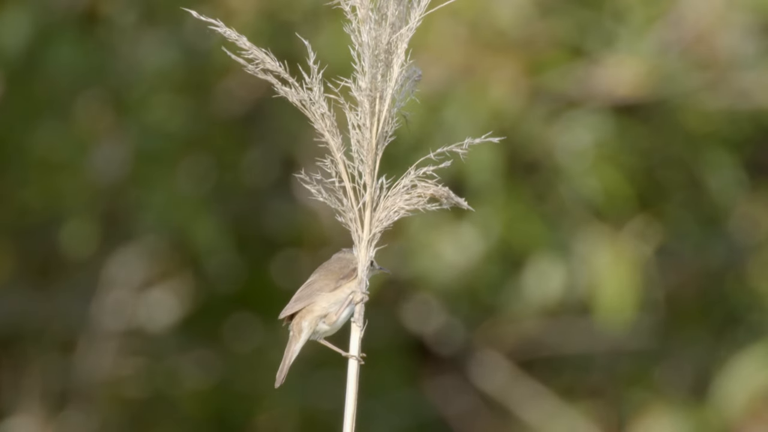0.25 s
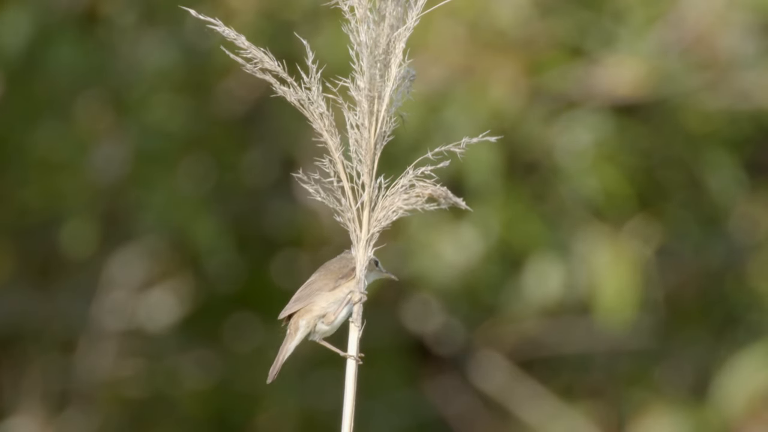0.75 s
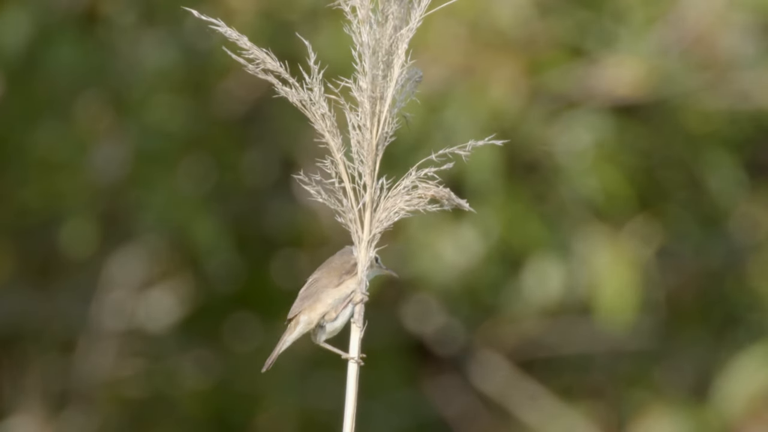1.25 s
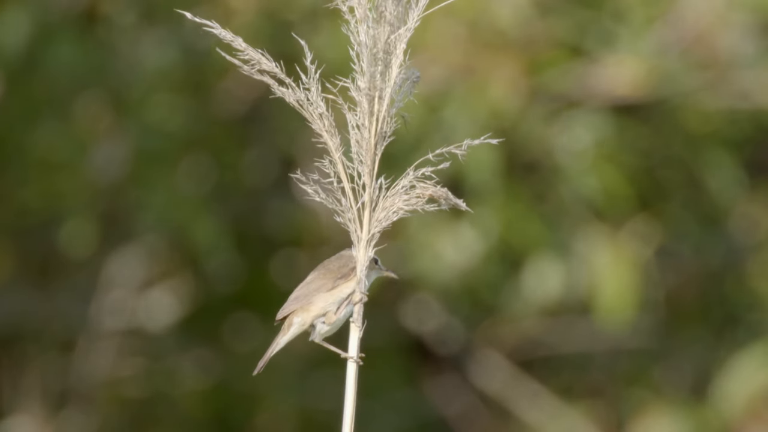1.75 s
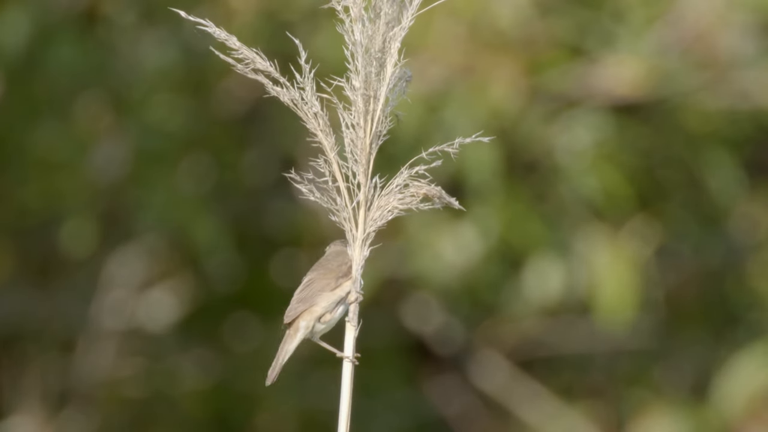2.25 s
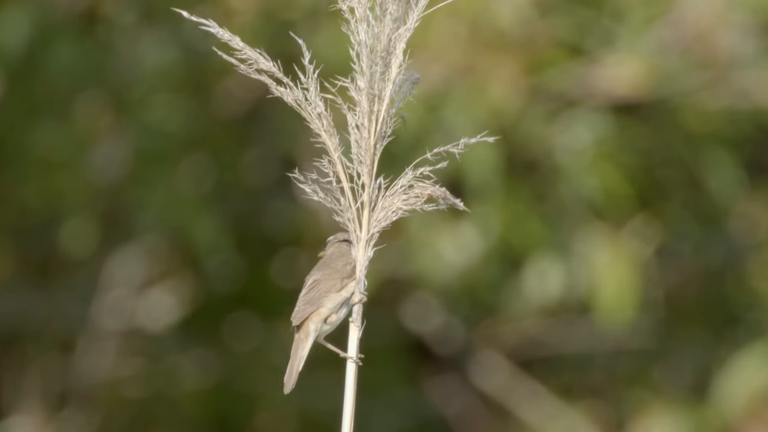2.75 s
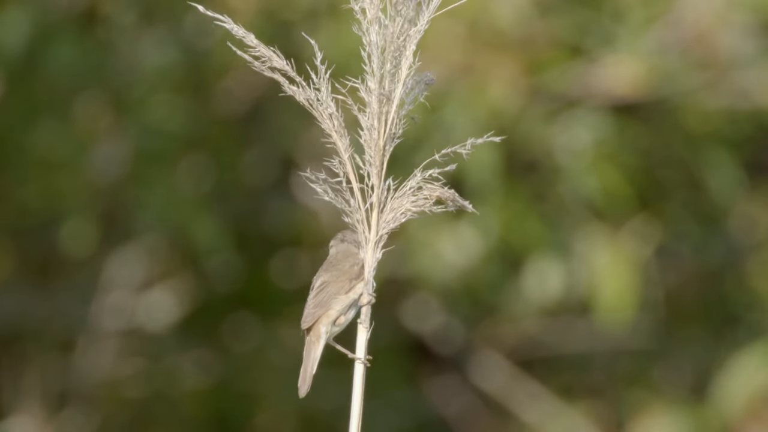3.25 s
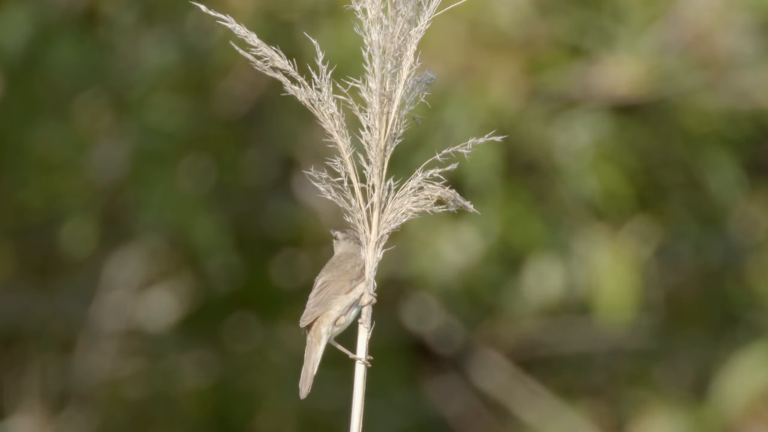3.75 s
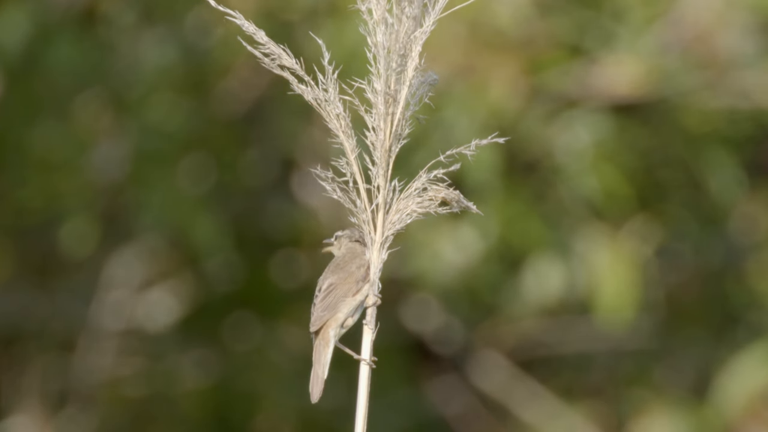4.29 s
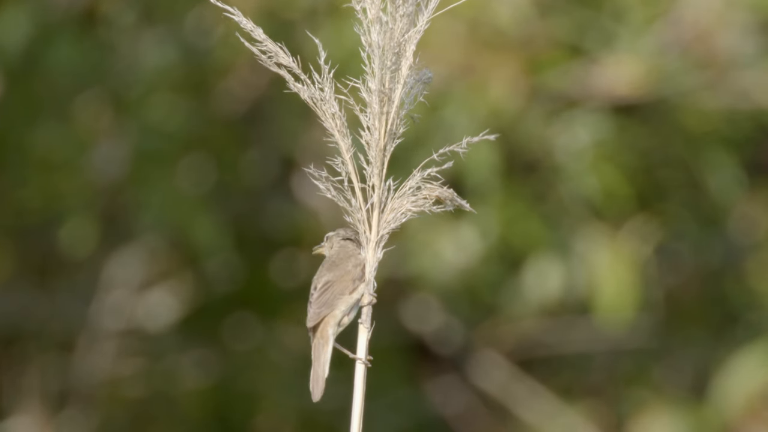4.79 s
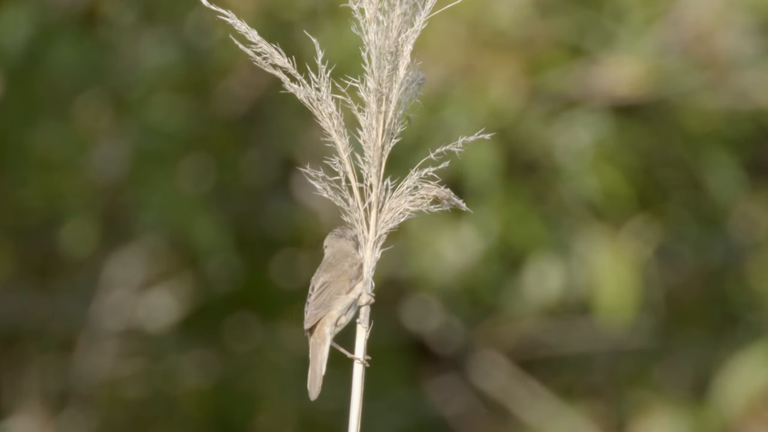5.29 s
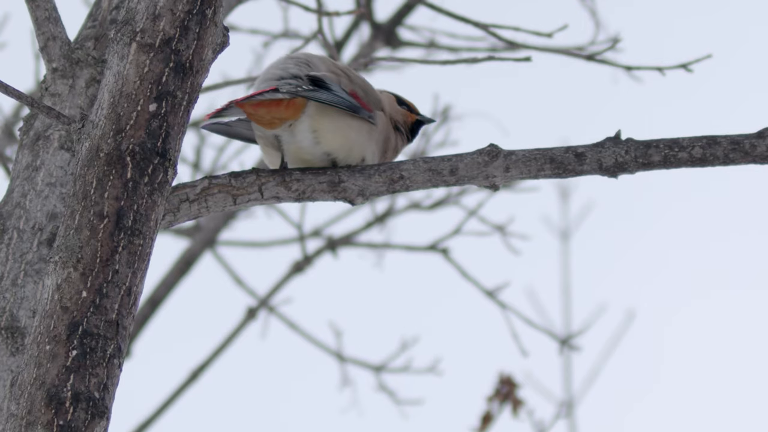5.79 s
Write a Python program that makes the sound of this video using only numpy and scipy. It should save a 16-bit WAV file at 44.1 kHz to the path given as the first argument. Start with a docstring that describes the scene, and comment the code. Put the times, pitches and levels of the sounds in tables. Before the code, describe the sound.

Outdoors in reeds, soft hiss and faint, quick twittering from distant birds come first. A close songbird then gives crisp paired chips that grow louder, a low pure whistle swells nearby, and a busy burst of flicks and short notes follows. Strong, evenly spaced falling slides take over with short reed echoes and a longer tree tail. A hard cut leaves quiet, dull noise with a thin tone.

```python
"""A warbler in a reed bed sings sharp chips and falling slides, each note a sine steered in pitch and level.
Rising calls and flicks come from among the reeds, a second bird whistles low, and farther birds chatter,
trill and buzz as shorter, weaker sines. Soft outdoor hiss and faint bands of noise lie underneath.
Decaying bursts of noise serve as echoes from reeds and trees. Near the end the scene cuts to a duller,
quieter place with a thin tone near 1.4 kHz."""
import sys
import numpy as np
from scipy import signal
from scipy.fft import rfft, irfft, next_fast_len
from scipy.io import wavfile
from scipy.ndimage import uniform_filter1d, minimum_filter1d

SR = 44100
rng = np.random.default_rng(int(sys.argv[2]) if len(sys.argv) > 2 else 0)


def master(y):
    """Save y as 16-bit WAV."""
    cut = np.clip(np.atleast_2d(y).T, -1, 1)
    pcm = np.round(cut * 32767)  # scale
    wavfile.write(sys.argv[1], SR, pcm.astype(np.int16))


N = 265967   # samples
TIME_S = np.arange(N) / SR
CUT_S = 5.703   # middle of the cut to the second place


def from_db(db):
    """Decibels to gain."""
    return 10 ** (np.asarray(db) / 20)


def whistle(notes):
    """Each note is a sine that follows its rows of time, pitch and rms level, corners rounded."""
    out = np.zeros(N)
    for rows, start_cycle in zip(notes, rng.random(len(notes))):
        t, hz, db = np.transpose(rows)
        at = np.arange(max(int(t[0] * SR), 0), min(int(t[-1] * SR), N))
        hz = uniform_filter1d(np.interp(at / SR, t, hz), size=60, mode="nearest")
        db = uniform_filter1d(np.interp(at / SR, t, db), size=60, mode="nearest")
        fade = np.clip(np.minimum(at - at[0], at[-1] - at) / 40, 0, 1)   # 40 samples, against clicks
        cycles = start_cycle + np.cumsum(hz) / SR
        out[at] += np.sqrt(2) * fade * from_db(db) * np.sin(2 * np.pi * cycles)
    return out


def with_octave(notes, octave_db):
    """Notes with a faint octave from the syrinx."""
    octave = [[(t, 2 * hz, db + octave_db) for t, hz, db in rows] for rows in notes]
    return whistle(notes) + whistle(octave)


def from_shape(shape, events):
    """Places a note shape at each event, shifted in pitch and level and stretched in time."""
    return [[(t + dt * stretch, hz * ratio, db + level_db) for dt, hz, db in shape]
            for t, level_db, ratio, stretch in events]


def swinging_note(rows, swing):
    """Pitch swings about its centre and the level dips at the top of each swing."""
    per_s, swing_hz, lowest_s, loss_db = swing
    at, centre_hz, db = np.transpose(rows)
    t = np.arange(at[0], at[-1], 4 / SR)
    up = -np.cos(2 * np.pi * per_s * (t - lowest_s))   # -1 at the bottom, 1 at the top
    hz = np.interp(t, at, centre_hz) + swing_hz * up
    return np.c_[t, hz, np.interp(t, at, db) - loss_db * (1 + up) / 2]


def coloured_noise(spectrum, patchy_db, sway_db=0):
    """White noise shaped by a spectrum, its half-octave bands flickering and swaying under a steady treble; rms 1."""
    size = next_fast_len(N)
    hz = np.maximum(np.arange(size // 2 + 1) * SR / size, 1)
    point_hz, point_db = np.transpose(spectrum)
    colour_db = np.interp(np.log(hz), np.log(point_hz), point_db)
    shaped = rfft(rng.standard_normal(size)) * from_db(colour_db)
    half_octave = np.clip(2 * np.log2(hz / 30), 0, 18)
    out = 0
    for band in range(19):
        share = np.clip(1 - abs(half_octave - band), 0, 1)   # neighbouring bands crossfade
        flicker = np.interp(np.arange(N), np.linspace(0, N, 40), rng.standard_normal(40))
        unsteady = np.clip((17 - band) / 3, 0, 1)   # fades out from about 4 to 11 kHz
        out = out + irfft(shaped * share, size)[:N] * from_db(unsteady * (patchy_db * flicker + sway_db))
    return out / np.std(out)


def noise_band(gain, hz, width_hz):
    """A band of noise, levelled to rms 1 and put under a gain curve."""
    edges = [hz - width_hz / 2, hz + width_hz / 2]
    band = signal.sosfilt(signal.butter(2, edges, "band", fs=SR, output="sos"), rng.standard_normal(N))
    return gain * band / np.std(band)


def swells(events):
    """Gain of smooth rises and falls, one for each row of middle, length and level."""
    gain = 0
    for middle, length, db in events:
        place = np.clip((TIME_S - middle) / length, -.5, .5)
        gain = gain + from_db(db) * np.cos(np.pi * place) ** 2
    return gain


def scatter(x, clusters):
    """Dense random echoes: one decaying noise burst for each cluster of reflectors."""
    t, echoes = np.arange(SR) / SR, 0
    for start, t60, energy_db in clusters:
        onset = np.clip((t - start) / 0.00092, 0, 1)
        tail = rng.standard_normal(SR) * onset * from_db(-60 * t / t60)
        echoes = echoes + from_db(energy_db) * tail / np.sqrt(np.sum(tail ** 2))
    return signal.fftconvolve(x, echoes)[:N]


# spectrum of the second place: f/Hz, relative level/dB (per Hz)
QUIET_SPECTRUM = [(15, -70), (25, -44), (285, -32), (607, -22), (734, -13), (1230, -14), (1400, -9),
                  (1520, -6.5), (2480, -10.5), (4870, -26), (5430, -33), (14000, -41.5), (16000, -46)]
# its thin tone: t/s, f/Hz, level/dB
THIN_TONE_ROWS = [(5.71, 1440, -62), (5.724, 1408, -46.5), (5.862, 1387, -47), (5.892, 1393, -57.5),
                  (5.97, 1398, -43.5), (6.03, 1390, -40.5)]


def quiet_place():
    """Dull, patchy noise with one thin sine on top."""
    return from_db(-46) * coloured_noise(QUIET_SPECTRUM, patchy_db=1.5) + whistle([THIN_TONE_ROWS])


# spectrum of the outdoor hiss: f/Hz, relative level/dB (per Hz)
HISS_SPECTRUM = [(15, -66), (25, -40.5), (87, -35.5), (180, -28), (229, -22.5), (394, -14.5), (463, -9.5),
                 (560, -11.5), (936, -2.5), (1790, -2), (2910, -0.5), (3430, -2.5), (7110, -11.5),
                 (14800, -16), (16000, -14.5)]
# slow sway below the treble, heard as departures from its mean: t/s, level/dB
HISS_SWAY_ROWS = [(0.0, -52), (0.32, -53), (0.68, -52.5), (1.05, -53.5), (1.44, -52.5), (4.06, -54.5),
                  (4.46, -53), (5.56, -54), (5.7, -53)]


def outdoor_hiss():
    """Soft broadband noise whose level sways below a steady treble."""
    t, db = np.transpose(HISS_SWAY_ROWS)
    sway_db = np.interp(TIME_S, t, db - np.mean(db))
    return from_db(-43) * coloured_noise(HISS_SPECTRUM, patchy_db=.5, sway_db=sway_db)


# wind on the microphone: middle t/s, length/s, level/dB
WIND_PUFFS = [(.07, 0.18, -80), (.21, .08, -78), (.31, .09, -84)]


def wind_puffs():
    """Brief swells of noise around 48 Hz."""
    return noise_band(swells(WIND_PUFFS), hz=48, width_hz=52)


# low rumble: middle t/s, length/s, level/dB
RUMBLE_SWELLS = [(.0, 0.26, -59), (.65, 0.37, -61.5)]


def rumble():
    """Swells of noise around 386 Hz."""
    return noise_band(swells(RUMBLE_SWELLS), hz=386, width_hz=160)


# faint low hums that come and go: middle t/s, length/s, f/Hz, level/dB
HUM_SWELLS = [(1.5, 1.9, 246, -76), (2.95, 0.4, 245, -71.5), (5.2, 2.1, 236, -79), (1.35, 1.9, 485, -65.5),
              (2.035, 1.34, 473, -62), (4.41, 0.91, 505.4, -63), (5.125, 0.66, 360, -63),
              (5.6, .3, 343, -67)]


def hums():
    """Noise bands so narrow that each sounds like a wavering pitch."""
    return sum(noise_band(swells([(middle, length, db)]), hz, width_hz=14)
               for middle, length, hz, db in HUM_SWELLS)


# thin band of noise, perhaps an insect: middle t/s, length/s, level/dB
THIN_BAND_SWELLS = [(.12, 0.22, -47.5), (.3, 0.45, -51), (.47, 0.28, -52)]
# its band: centre f/Hz, width/Hz
THIN_BAND_PLACE = (2790, 59)


def thin_band():
    """Overlapping swells of narrow noise."""
    return noise_band(swells(THIN_BAND_SWELLS), *THIN_BAND_PLACE)


# level of the faint far chorus: t/s, level/dB
CHORUS_LEVEL = [(0.0, -57), (1.3, -64), (2.0, -54.5), (3.3, -55), (5.7, -48.5)]
# its band: centre f/Hz, width/Hz
CHORUS_BAND = (2883, 180)


def far_chorus():
    """A chorus blurred into one band of noise whose level drifts."""
    t, db = np.transpose(CHORUS_LEVEL)
    return noise_band(from_db(np.interp(TIME_S, t, db)), *CHORUS_BAND)


# pitch range of the farthest birds: lowest and highest middle f/Hz
FLUTTER_RANGE = (2500, 5150)
# how forward they are: t/s, added level/dB
FLUTTER_FORWARD = [(0, 3), (1.4, -1), (1.7, -5), (2.4, 7), (3., .1), (3.7, 6), (4., 0.5), (5.7, -1.5)]


def flutter_strokes():
    """Half-buried strokes of the farthest birds, scattered at random in time, pitch, glide, length and level."""
    when, pitch, sweep, length, level = rng.random((520, 5)).T
    t = when * CUT_S
    low_hz, high_hz = FLUTTER_RANGE
    middle_hz = low_hz * (high_hz / low_hz) ** pitch
    glide_hz = 1100 * (sweep - .35)   # most strokes rise
    db = -53 + 6 * level + np.interp(t, *np.transpose(FLUTTER_FORWARD))
    length_ms = 3.5 + 5 * length
    return list(np.c_[t, length_ms, middle_hz - glide_hz, middle_hz, middle_hz + .3 * glide_hz, db])


# a neighbour's phrase, two steep strokes and three hooks stepping down:
# t after the start/ms, length/ms, start f/Hz, middle f/Hz, end f/Hz, relative level/dB
PHRASE_SHAPE = [(0, 7, 3100, 4300, 5250, -8), (38, 6.5, 3250, 4450, 5100, -6),
                (53, 12, 3750, 4600, 4250, -1), (70, 12, 3600, 4350, 4680, -1),
                (87, 14, 3500, 4200, 4300, 0)]
# where it is sung: t/s, level/dB, pitch ratio
PHRASE_EVENTS = [(3.917, -33.5, 1.03), (4.091, -31.5, 1.01), (4.27, -28.5, .97), (4.45, -32, .98)]
# a farther bird's triplet of hooks:
# t after the start/ms, length/ms, start f/Hz, middle f/Hz, end f/Hz, relative level/dB
TRIPLET_SHAPE = [(0, 9, 4100, 4700, 4600, -3), (16, 7, 3450, 3980, 4000, -1.5),
                 (35, 7.5, 3450, 3900, 3880, 0)]
# where it is sung: t/s, level/dB, pitch ratio
TRIPLET_EVENTS = [(0.77, -39, 1.01), (0.864, -38, 1), (0.961, -39, 1.01), (1.062, -38.5, 1.),
                  (1.163, -40, 0.96)]
# runs of one repeated note: t/s, notes, spacing/ms, length/ms,
# start f/Hz, middle f/Hz, end f/Hz, first level/dB, growth per note/dB
NOTE_RUNS = [(0.288, 2, 49, 24, 5200, 4900, 4860, -42.5, 2),
             (1.375, 4, 97, 24, 5900, 5850, 5200, -47, -1.5), (2.33, 2, 49, 16, 3540, 3450, 3650, -52, 3),
             (2.427, 2, 33, 12.4, 3200, 3320, 3800, -42, 1), (2.34, 4, 36, 6.5, 2750, 2650, 2450, -39.5, 0),
             (2.762, 5, 34.6, 13, 3156, 3410, 3820, -45, 1.1),
             (2.77, 4, 38, 5.1, 2410, 2555, 2750, -45, -1),
             (3.905, 3, 90, 42, 2800, 2495, 2360, -41.5, 0.4),
             (5.218, 2, 36, 19, 3390, 3260, 2470, -27, 1.5), (5.333, 2, 36, 20, 3355, 3255, 2400, -29, 0),
             (5.54, 4, 37, 6, 2810, 2925, 3010, -45.5, 4.5)]


def patterned_notes():
    """Unrolls phrases, triplets and runs into single notes."""
    notes = []
    for motif, events in ((PHRASE_SHAPE, PHRASE_EVENTS), (TRIPLET_SHAPE, TRIPLET_EVENTS)):
        for t, level_db, ratio in events:
            for ms, length, start_hz, middle_hz, end_hz, db in motif:
                notes.append((t + ms / 1000, length, start_hz * ratio, middle_hz * ratio,
                              end_hz * ratio, db + level_db))
    for t, count, gap_ms, *shape, db, growth_db in NOTE_RUNS:
        for k in range(round(count)):
            notes.append((t + k * gap_ms / 1000, *shape, db + k * growth_db))
    return notes


# clearest lone notes of far birds: t/s, length/ms, start f/Hz, middle f/Hz, end f/Hz, level/dB
LONE_STROKES = [(0.0, 8, 4760, 4830, 4930, -38), (0.212, 9, 4500, 4710, 4800, -44),
                (0.243, 15, 4560, 4830, 4560, -39), (0.245, 20, 2500, 2330, 2220, -45),
                (0.564, 10.4, 5890, 5140, 4930, -43), (0.647, 6, 3850, 4040, 3800, -42),
                (0.682, 11, 4330, 4860, 4840, -42), (0.738, 30, 4540, 4510, 4930, -46),
                (0.828, 8.6, 5370, 4570, 4580, -40), (0.835, 10, 3920, 3560, 3030, -43),
                (0.94, 24, 4550, 4800, 4770, -46), (1.113, 9.8, 4570, 4850, 4500, -42),
                (1.135, 4.2, 5470, 4770, 4870, -36), (1.262, 5, 4790, 4670, 3910, -35),
                (1.277, 8, 2040, 2280, 2120, -44), (1.294, 5, 3860, 3900, 3820, -34.5),
                (1.316, 17, 2050, 2210, 2420, -41), (1.39, 10, 5300, 4720, 4300, -45),
                (1.407, 6, 5040, 4670, 4350, -41), (1.569, 12.6, 2860, 3120, 3430, -39.5),
                (1.803, 14, 2450, 2520, 2900, -46), (1.858, 13, 2700, 2980, 2900, -42),
                (1.878, 12, 2900, 2770, 2590, -47), (2.004, 4.4, 2740, 2850, 2650, -41),
                (2.24, 19, 4770, 4850, 4840, -49), (2.298, 8.4, 2380, 2640, 2560, -42),
                (2.39, 12, 4900, 4860, 4920, -43), (2.471, 9.2, 2190, 2650, 2810, -42),
                (2.486, 10, 3980, 4170, 3610, -39), (2.648, 5, 3610, 4000, 3790, -33),
                (2.85, 16, 5600, 5800, 5850, -53), (2.94, 25, 4720, 4870, 4950, -45),
                (3.098, 15, 4700, 4940, 4620, -42), (3.165, 7.5, 3300, 4340, 5100, -41),
                (3.187, 8, 5240, 4310, 3300, -35.5), (3.195, 25, 5100, 5330, 5450, -45.5),
                (3.331, 3, 10600, 9700, 8300, -35.5), (3.486, 5, 5410, 5107, 5070, -43),
                (3.639, 25, 4600, 4700, 4900, -47.5), (3.682, 4, 2530, 2940, 2830, -37),
                (3.711, 7.1, 1813, 2740, 2900, -38), (4.558, 76, 7360, 7120, 6650, -50.5),
                (5.041, 7.2, 5400, 5940, 7200, -49)]
# the warbler's soft arching note: t after the start/s, f/Hz, relative level/dB
ARCH_SHAPE = [(0, 2900, -20), (.002, 3690, -7), (.005, 4230, -1), (.009, 4150, -1), (.014, 3900, 1),
              (.017, 3500, -18), (.02, 3100, -16)]
# where it is sung: t/s, level/dB, pitch ratio, time stretch
ARCH_EVENTS = [(1.701, -41.5, 0.98, 1), (1.861, -39, 0.95, 0.94), (1.918, -37, 0.99, 1.24),
               (1.982, -32.5, 1, 1.04), (2.062, -29, 1.01, 1.12), (2.164, -28, 0.95, 0.93)]


def chatter():
    """Short far notes, whose pitch bends along a parabola through three points while the level rises and falls,
    and the warbler's soft arching notes."""
    u, notes = np.linspace(0, 1, 9), []   # u runs from start to end of a note
    for t, ms, start_hz, middle_hz, end_hz, db in LONE_STROKES + patterned_notes() + flutter_strokes():
        bend = np.polyfit([0, .5, 1], [start_hz, middle_hz, end_hz], 2)
        notes.append(np.c_[t + u * ms / 1000, np.polyval(bend, u), db - 10 * (2 * u - 1) ** 4])
    return whistle(notes + from_shape(ARCH_SHAPE, ARCH_EVENTS))


# short buzzes of a far bird: t/s, length/s, level/dB
BUZZ_EVENTS = [(4.735, 0.017, -45), (4.79, 0.012, -44), (4.85, 0.018, -44), (4.908, 0.01, -44),
               (4.965, 0.016, -41), (5.02, 0.016, -43), (5.081, 0.016, -38.5), (5.138, 0.015, -43.5),
               (5.558, 0.027, -39), (5.64, 0.024, -39)]
# their swing: swings per s, swing f/Hz, level lost at the top/dB
BUZZ_MOTION = (115, 950, 3)


def buzzes():
    """Each buzz is a few wide swings of pitch, starting at the bottom."""
    centre_hz = 4390
    per_s, swing_hz, loss_db = BUZZ_MOTION
    notes = []
    for t, length, db in BUZZ_EVENTS:
        rows = [(t, centre_hz, db), (t + length, centre_hz, db)]
        notes.append(swinging_note(rows, (per_s, swing_hz, t, loss_db)))
    return whistle(notes)


# a high trill: t/s, centre f/Hz, level/dB
TRILL_ROWS = [(5.052, 6900, -50.5), (5.06, 6370, -35.5), (5.235, 6370, -36.5), (5.25, 6350, -59)]
# its swing: swings per s, swing f/Hz, lowest at t/s, level lost at the top/dB
TRILL_MOTION = (47.8, 280, 5.062, 6)
# its echoes: start t/s, t60/s, energy level/dB
TRILL_ECHOES = [(.003, .11, -8.5), (.012, .7, -7)]


def triller():
    """A high whistle whose pitch swings fast, heard with its own scattered echoes."""
    trill = whistle([swinging_note(TRILL_ROWS, TRILL_MOTION)])
    return trill + scatter(trill, TRILL_ECHOES)


# the low whistler's long swell: t/s, f/Hz, level/dB
WHISTLER_SWELL = [(2.86, 1343, -63), (2.888, 1365, -54), (3.13, 1304, -48.5), (3.524, 1314, -42.5),
                  (3.586, 1319, -37), (3.9, 1321, -24.5), (3.954, 1305, -26), (3.97, 1283, -24),
                  (3.99, 1298, -53)]
# its three short notes, each with rows of: t/s, f/Hz, level/dB
WHISTLER_NOTES = [
    [(4.024, 1670, -41), (4.029, 1643, -23), (4.035, 1538, -17.5), (4.044, 1450, -16), (4.059, 1460, -19),
     (4.086, 1436, -19), (4.093, 1410, -23), (4.098, 1440, -42)],
    [(4.141, 2180, -36.5), (4.146, 2444, -25), (4.152, 2285, -13), (4.16, 2030, -18.5), (4.168, 2172, -13),
     (4.188, 2210, -13), (4.194, 2173, -12), (4.2, 2020, -36)],
    [(4.261, 3540, -51), (4.265, 3544, -26.5), (4.273, 3576, -23.5), (4.281, 3177, -19),
     (4.2835, 2920, -40), (4.287, 2856, -26), (4.291, 2478, -13.5), (4.296, 2216, -15),
     (4.305, 1836, -15.5), (4.323, 1358, -20), (4.332, 1175, -34), (4.348, 1060, -45)],
]


def low_whistler():
    """A second bird nearby: one long pure tone that swells, then three short notes."""
    return whistle([WHISTLER_SWELL] + WHISTLER_NOTES)


# two rising calls, each with rows of: t/s, f/Hz, level/dB
RISING_CALLS = [
    [(5.473, 3140, -45), (5.476, 3840, -19.5), (5.478, 5340, -11), (5.48, 6000, -16), (5.484, 6670, -19.5),
     (5.49, 7270, -24), (5.496, 7500, -33), (5.501, 7640, -22)],
    [(5.627, 6100, -53), (5.63, 6300, -18.5), (5.633, 6430, -17.5), (5.636, 6820, -16), (5.64, 7220, -26.5),
     (5.645, 7800, -34)],
]
# a rising flick: t after the start/s, f/Hz, relative level/dB
FLICK_SHAPE = [(0, 6590, -33.5), (.002, 6410, -3), (.005, 6610, -1.5), (.009, 7100, -5), (.012, 7700, -14),
               (.017, 8880, -27)]
# where it is sung: t/s, level/dB, pitch ratio, time stretch
FLICK_EVENTS = [(4.004, -16.5, 1.016, 1.0), (4.19, -19.5, 1.023, 0.96)]


def reed_calls():
    """Rising calls, and flicks with a faint octave, from the same spot among the reeds."""
    flicks = with_octave(from_shape(FLICK_SHAPE, FLICK_EVENTS), octave_db=-30)
    return whistle(RISING_CALLS) + flicks


# dense echo close to the reed calls: start t/s, t60/s, energy level/dB
NEAR_ECHO = (0.0015, 0.048, -10)


def near_echoes(calls):
    """Stems close by scatter the reed calls into a short, dense tail."""
    return scatter(calls, [NEAR_ECHO])


# echoes of near reeds, then of far trees: start t/s, t60/s, energy level/dB
REED_TREE_ECHOES = [(.006, 0.064, -12), (0.015, 0.703, -16)]


def reeds_and_trees(sent):
    """Reeds answer at once and briefly, trees later and longer."""
    return scatter(sent, REED_TREE_ECHOES)


# the chip: t after the start/s, f/Hz, relative level/dB
CHIP_SHAPE = [(-.001, 3840, -42.5), (.001, 4320, -8.5), (.003, 4240, -4), (.006, 4317, -0.5),
              (.0075, 4150, -2.5), (.0095, 4050, -12), (.013, 3930, -23), (.017, 3850, -38.5)]
# where it is sung: t/s, level/dB, pitch ratio, time stretch
CHIP_EVENTS = [(2.6033, -17, 1., 0.98), (2.722, -16.5, 0.99, 1.07), (2.927, -14.5, 0.96, 1.03),
               (3.022, -16, 0.99, 0.98), (3.209, -13.5, .99, 0.97), (3.304, -12, 1, 0.89),
               (3.4979, -11, 0.98, 0.9), (3.604, -11.5, .985, 0.85), (4.431, -9.5, 1, 1.02)]
# the falling slide: t after the start/s, f/Hz, relative level/dB
SLIDE_SHAPE = [(0, 4100, -35), (.002, 3990, -14), (.004, 4408, -5), (.008, 4410, -3.5), (.013, 4168, -4),
               (.017, 4008, -8), (.023, 3810, -12), (.029, 3593, -10.5), (.036, 3373, -10),
               (.043, 3190, -12.5), (.05, 3046, -25), (.058, 2995, -33.5), (.072, 2980, -40)]
# where it is sung: t/s, level/dB, pitch ratio, time stretch
SLIDE_EVENTS = [(3.788, -5.5, 0.98, 0.89), (4.597, -4.5, 0.99, 0.92), (4.769, -4, 0.99, 0.92),
                (4.939, -4, 0.99, 0.94), (5.113, -4, 0.98, 0.98), (5.288, -3, 0.99, 0.96)]
# the warbler's single note, with rows of: t/s, f/Hz, level/dB
SINGLE_NOTES = [
    [(4.338, 3460, -42), (4.342, 4080, -16.5), (4.345, 4420, -17), (4.35, 4320, -11), (4.354, 4370, -24)],
]


def warbler():
    """Chips, falling slides and a single note, with a very faint octave from the syrinx."""
    notes = from_shape(CHIP_SHAPE, CHIP_EVENTS) + from_shape(SLIDE_SHAPE, SLIDE_EVENTS)
    return with_octave(notes + SINGLE_NOTES, octave_db=-49)


def mirrored(song):
    """A strong reflection just beside the warbler notches the spectrum, so a falling note seems to throb."""
    peak_spacing_hz, strength = 425.2, 0.69
    late = np.interp(np.arange(N) - SR / peak_spacing_hz, np.arange(N), song)
    return song + strength * late


def scene():
    """Birds with their echoes over hiss, then a hard cut to the second place."""
    background = outdoor_hiss() + wind_puffs() + rumble() + hums() + thin_band() + far_chorus()
    far = chatter() + buzzes()
    whistler, calls, song = low_whistler(), reed_calls(), warbler()
    echoes = reeds_and_trees(from_db(2.5) * song + whistler + from_db(4) * calls + far)
    birds = far + triller() + whistler + calls + near_echoes(calls) + mirrored(song) + echoes
    after = np.clip((TIME_S - CUT_S) / .003 + .5, 0, 1)   # the cut takes 3 ms
    return ((1 - after) * (background + birds) + after * quiet_place())[None]


def record(dry):
    """A look-ahead limiter holds the loudest notes under full scale, then the top is cut steeply."""
    allowed = minimum_filter1d(np.minimum(1, .99 / (abs(dry) + 1e-9)), size=201)
    limited = dry * uniform_filter1d(allowed, size=181)
    top_cut = signal.ellip(14, .3, 80, 15750, fs=SR, output="sos")   # low-pass at 15.75 kHz
    return signal.sosfilt(top_cut, limited)


dry = scene()
out = record(dry)
master(out)
```